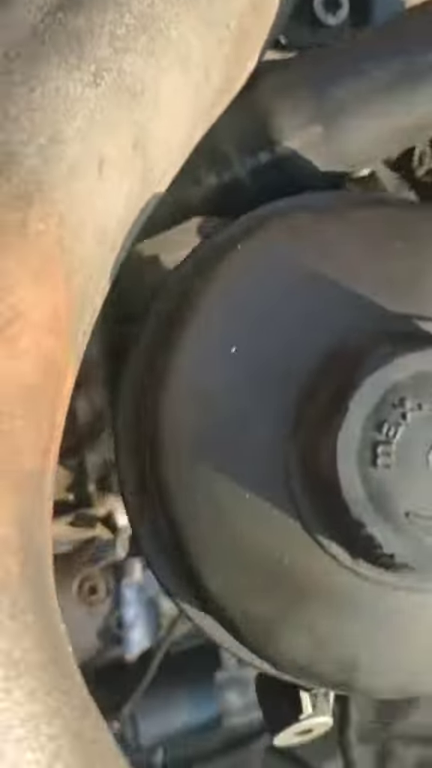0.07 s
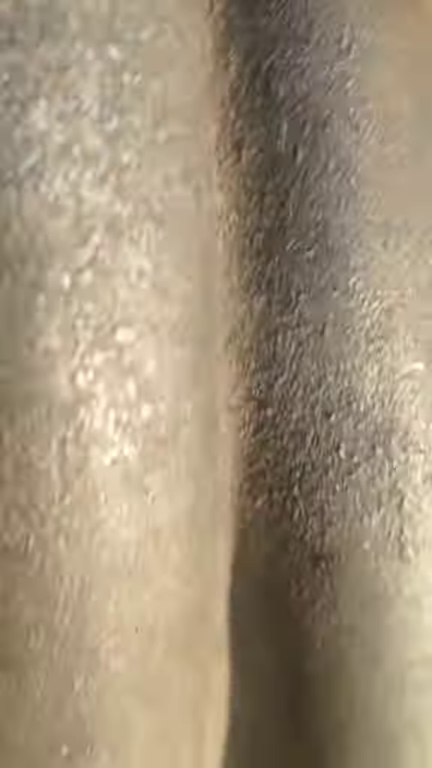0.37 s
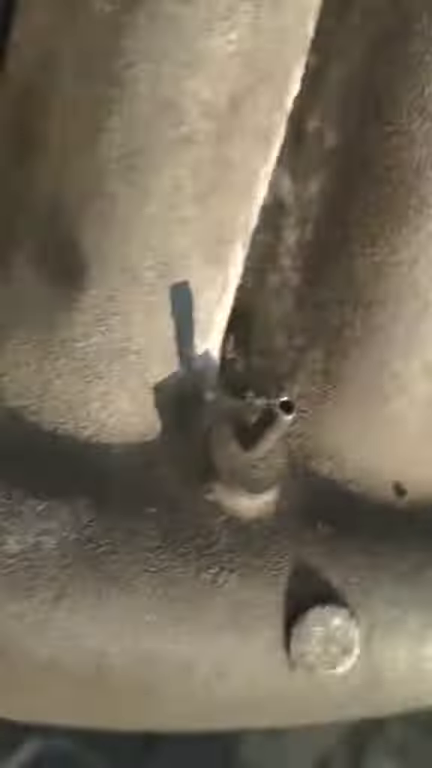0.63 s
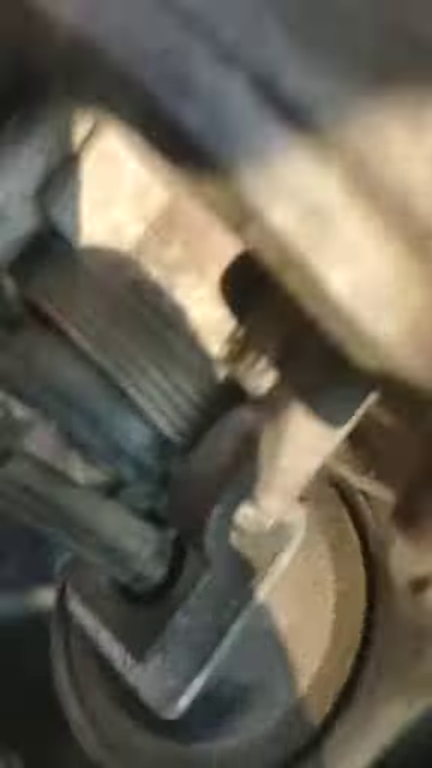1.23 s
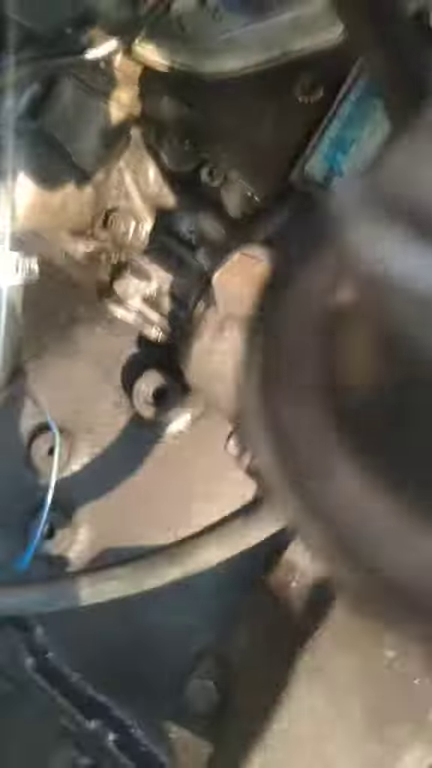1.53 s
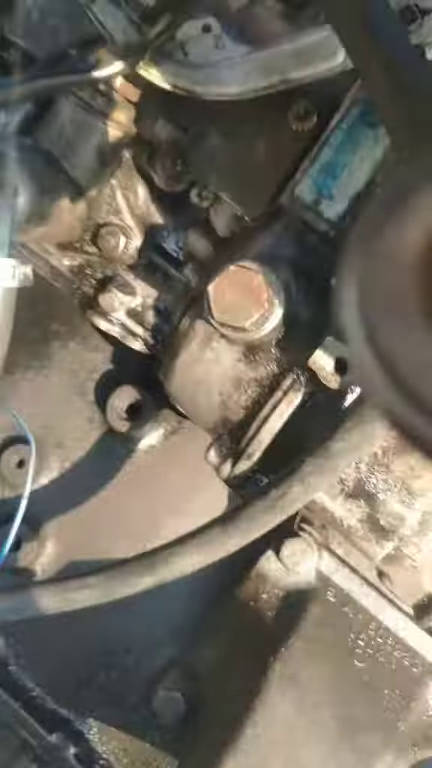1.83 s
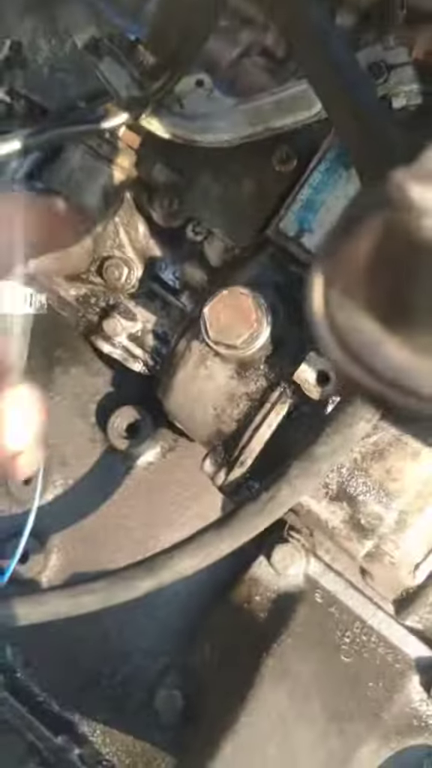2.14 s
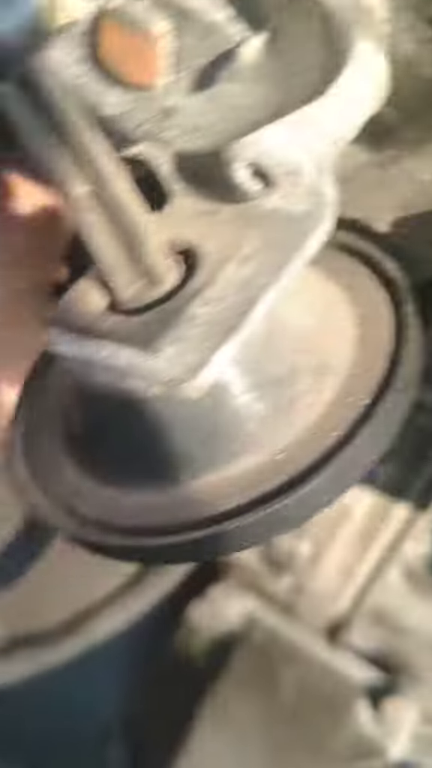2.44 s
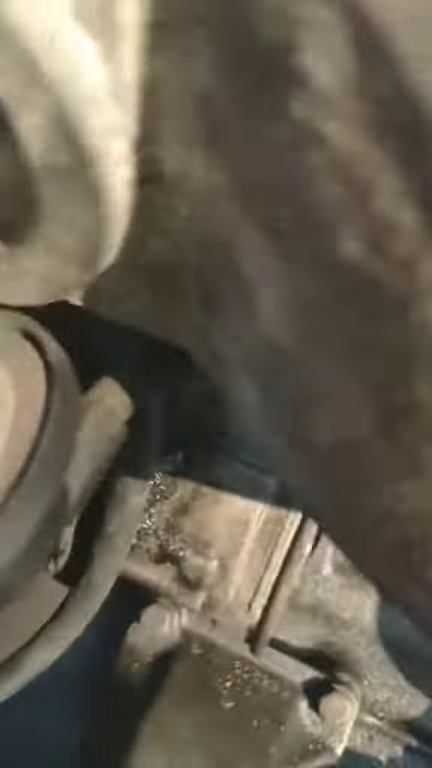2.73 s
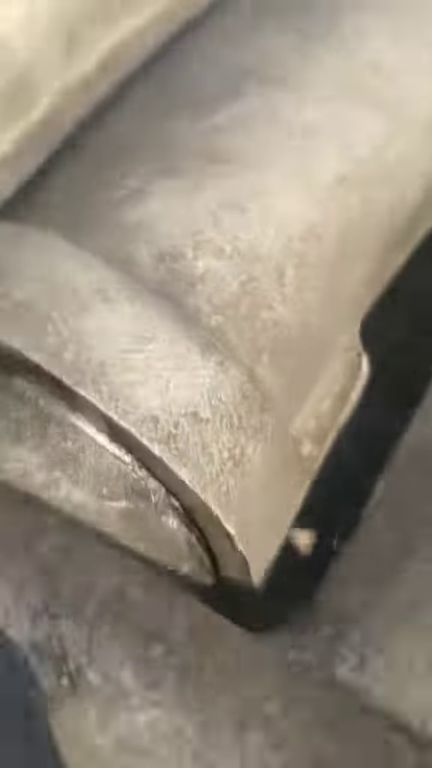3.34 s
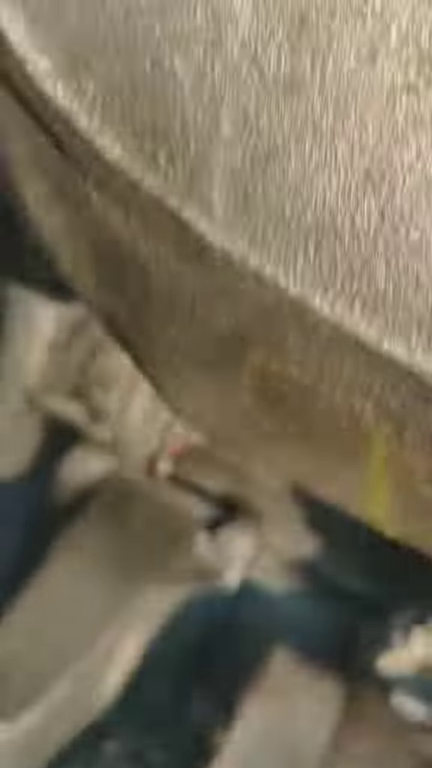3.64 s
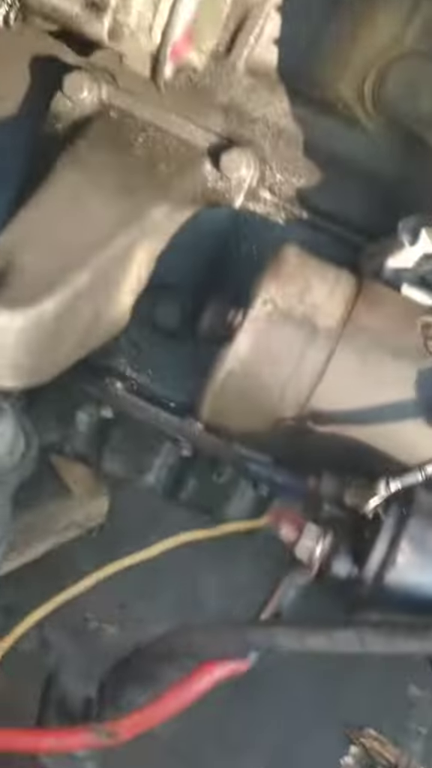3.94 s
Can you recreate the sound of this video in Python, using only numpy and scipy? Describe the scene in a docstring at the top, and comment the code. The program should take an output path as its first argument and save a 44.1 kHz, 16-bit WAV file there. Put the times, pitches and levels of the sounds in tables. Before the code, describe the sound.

A diesel engine idles close up in its bay, with hard, even knocking and light ticking over a low rumble. It then shuts off, shuddering to rest with a few clunks and leaving faint open air.

```python
"""Hard knocking over a lopsided boom: a six-cylinder diesel idling, heard from inside its bay.
Every firing knocks the block, rings the head and sends puffs through the pipes, in a pattern that
returns each engine cycle. Tappets tick; gears, belt and fan churn behind. Near 3 s the fuel is cut:
the engine shudders, its linkages clunk, and it rocks to rest, leaving faint open air."""
import sys
import numpy as np
from scipy import signal
from scipy.fft import rfft, irfft, next_fast_len
from scipy.io import wavfile
from scipy.ndimage import map_coordinates

SR = 44100
rng = np.random.default_rng(int(sys.argv[2]) if len(sys.argv) > 2 else 0)


def file_out(sig):
    """Save sig as 16-bit WAV at sys.argv[1]."""
    # one column per channel
    cols = np.atleast_2d(sig).T
    # limit, then scale
    lim = np.clip(cols, -1, 1)
    pcm = np.round(lim * 32767).astype(np.int16)
    wavfile.write(sys.argv[1], SR, pcm)


N = 176400
TIME_S = np.arange(N) / SR
FUEL_CUT_S = 2.96
KNOCK_RISE_S, CRACK_RISE_S = 0.00062, 0.00061
KNOCK_WIDTH, CLACK_WIDTH = 0.61, 0.37  # side/mid


def amp(db):
    """dB to amplitude."""
    return 10 ** (np.asarray(db) / 20)


def unit(x):
    """Scale to rms 1."""
    return x / np.sqrt(np.mean(np.abs(x) ** 2) + 1e-20)


def curve(rows, at_s=TIME_S):
    """Interpolate a (t/s, value) table."""
    return np.interp(at_s, *np.transpose(rows))


def wobble(knots_per_s):
    """Smooth random curve."""
    return map_coordinates(rng.standard_normal(N // 20), [TIME_S * knots_per_s], mode="wrap")


def colour(points):
    """Response through (f/Hz, gain/dB) points, log frequency axis."""
    hz, db = np.transpose(points)
    return lambda f: amp(np.interp(np.log(f + 1), np.log(hz + 1), db))


def body(modes):
    """Causal response of (f/Hz, bandwidth/Hz, gain/dB) resonances, alternating in sign."""
    return lambda f: sum((-1) ** k * amp(db) * 1j * f * bw / (hz * hz - f * f + 1j * f * bw)
                         for k, (hz, bw, db) in enumerate(modes))


def filtered(x, response):
    """Apply a frequency response."""
    size = next_fast_len(N + SR // 2)
    return irfft(rfft(x, size) * response(np.fft.rfftfreq(size, 1 / SR)), size)[..., :N]


def rattle(envelope, response, width, mono_below_hz=990):
    """Random contacts shake a body: stereo noise, rms following the envelope."""
    mid, side = rng.standard_normal((2, N))
    side = width * filtered(side, lambda f: f / np.hypot(f, mono_below_hz))
    pair = np.array([mid + side, mid - side])
    return filtered(pair * envelope, lambda f: unit(response(f)))


def bursts(blows, rise_s):
    """Power-summed envelope of (t/s, level/dB, T60/s) blows."""
    power, t = np.zeros(N + SR), np.arange(SR // 2) / SR
    for at_s, db, t60_s in blows:
        envelope = amp(db - 60 * t / t60_s) * (1 - np.exp(-t / rise_s))
        power[max(0, round(at_s * SR)):][:len(t)] += envelope ** 2
    return np.sqrt(power[:N])


def struck_mode(at_s, hz, db, rise_s, t60_s):
    """One decaying sine."""
    return bursts([(at_s, db, t60_s)], rise_s) * np.sin(2 * np.pi * hz * (TIME_S - at_s))


# Air spectrum: f/Hz, density/dB
AIR_SPECTRUM = [(15, -49), (25, -10), (75, -17.5), (113, 11.5), (331, -3.5), (445, -15.5), (2060, -7.5),
                (6050, -15), (9050, -15.5), (13500, -22), (15500, -8)]
# Air envelope: t/s, level/dB
AIR_ENVELOPE = [(3.75, -56), (3.89, -56), (3.94, -47), (4, -53.5)]


def open_air():
    """Faint wide noise, swelling briefly at the end."""
    return rattle(amp(curve(AIR_ENVELOPE)), colour(AIR_SPECTRUM), width=1)


# Hiss spectrum: f/Hz, density/dB
SIGH_SPECTRUM = [(1000, -15), (4000, -1.5), (8000, -10.5), (9800, 0.5), (11000, -13), (15000, -17.5)]


def sigh():
    """Air escapes as the engine stops."""
    envelope = bursts([(3.276, -39, .38)], rise_s=.015)
    return rattle(envelope, colour(SIGH_SPECTRUM), CLACK_WIDTH)


# Churn spectrum: f/Hz, density/dB
CHURN_SPECTRUM = [(25, -10.5), (60, -8.5), (120, 6), (200, 0), (270, 1.5), (350, -2), (480, -10), (800, -9),
                  (1300, -17.5), (1600, -12.5), (2700, -23.5), (3900, -22), (6300, -34.5), (9300, -36),
                  (13000, -44), (16000, -56.5)]
# Envelope of the rotating parts: t/s, level/dB
SPIN_ENVELOPE = [(0, -23.5), (1, -22), (2.9, -21), (3.02, -26.5), (3.13, -30), (3.18, -37.5), (3.27, -41.5),
                 (3.34, -46.5), (3.42, -55), (3.47, -55), (3.56, -51), (3.7, -54), (4, -65.5)]


def churn(grit_db=2.5):
    """Gears, belt and fan churn unevenly, then spin down."""
    level_db = curve(SPIN_ENVELOPE) + grit_db * wobble(knots_per_s=260)
    return rattle(amp(level_db), colour(CHURN_SPECTRUM), width=1)


# Block, head and injector pipe resonances: f/Hz, bandwidth/Hz, gain/dB
BLOCK_MODES = [(467, 47, -9.5), (589, 21.4, -2.5), (966, 445, -8), (1198, 250, -4.5), (1595, 138, -0.5),
               (1800, 206, -0.5), (2050, 490, -6)]
HEAD_MODES = [(2340, 95, 7.5), (3267, 390, 6), (4033, 370, 7), (4510, 810, 2)]
INJECTOR_PIPE_MODES = [(5360, 1300, 2.5), (6540, 120, 3.5), (7230, 430, 0.5), (9470, 950, 0.5),
                       (12600, 1600, -4)]


def tappets(count=190, until_s=3.2, scatter_db=13, t60_s=0.028):
    """Small valve-gear contacts at uneven moments, fading with the spin."""
    jitter, softness = rng.random((count, 2)).T
    times_s = (np.arange(count) + jitter) / count * until_s
    levels_db = curve(SPIN_ENVELOPE, times_s) - 4 - scatter_db * softness
    taps = bursts([(at_s, db, t60_s) for at_s, db in zip(times_s, levels_db)], CRACK_RISE_S)
    return rattle(taps, body(BLOCK_MODES + HEAD_MODES + INJECTOR_PIPE_MODES), CLACK_WIDTH)


# Loose-part impacts: t/s, thud/dB, T60/s, ring/dB
CLUNK_HITS = [(2.987, -23.5, 0.15, -31.5), (3.039, -19, 0.073, -30), (3.075, -35, 0.092, -37),
              (3.101, -28.5, .12, -35.5), (3.149, -36.5, 0.089, -40), (3.196, -28, 0.068, -45.5),
              (3.219, -25.5, .055, -41), (3.254, -18, 0.045, -31), (3.359, -35.5, 0.36, -47.5),
              (3.384, -40, 0.071, -54.5), (3.483, -41.5, 0.2, -60), (3.575, -43.5, 0.069, -54.5),
              (3.589, -30, 0.071, -45), (3.917, -50, 0.055, -50)]
# Thud spectrum: f/Hz, density/dB
THUD_SPECTRUM = [(60, -22), (200, 1), (350, 8), (560, -2), (900, 1), (1500, -6), (2400, -7), (4500, -15),
                 (7000, -21), (15000, -34)]


def clunks():
    """Loose parts settle, each with a dull thud and a slower-rising bright ring."""
    thud = bursts([(at_s, db, t60_s) for at_s, db, t60_s, _ in CLUNK_HITS], rise_s=0.0015)
    ring = bursts([(at_s, db + 5, t60_s) for at_s, _, t60_s, db in CLUNK_HITS], rise_s=0.0074)
    return (rattle(thud, colour(THUD_SPECTRUM), KNOCK_WIDTH)
            + rattle(ring, body(HEAD_MODES + INJECTOR_PIPE_MODES), CLACK_WIDTH))


# Pipe and mount vibrations: t/s, f/Hz, level/dB, rise/s, T60/s
SHUDDER_MODES = [(2.932, 174, -12, 0.02, 0.46), (2.973, 212, -9, .012, 0.21),
                 (3.058, 120.4, -11, 0.0076, 0.39), (3.063, 187.4, -12, 0.0084, 0.22),
                 (3.099, 212, -16, 0.006, 0.18), (3.1, 573, -26, .01, 0.19),
                 (3.139, 124.2, -12, 0.0057, 0.36), (3.365, 291, -21, 0.015, 0.09),
                 (3.384, 229.4, -23, .0088, .11), (3.486, 233.5, -34.5, 0.0037, 0.17),
                 (3.583, 147, -26.5, 0.0039, 0.35), (3.58, 341, -25, 0.0067, 0.083),
                 (3.583, 572, -32.5, 0.006, .07)]


def shudders():
    """The last compressions shake the pipes and mounts."""
    return sum(struck_mode(*mode) for mode in SHUDDER_MODES)


# Engine speed: t/s, firing rate/Hz
FIRING_RATE = [(0, 24.27), (.35, 24.43), (.7, 24.62), (1.15, 24.4), (1.6, 24.8), (2.1, 24.37), (2.6, 25.04),
               (2.8, 24.04), (2.95, 22.95)]


def crank(first_s=.005):
    """Running firing count per sample, and firing times up to the fuel cut."""
    firing_count = np.cumsum(curve(FIRING_RATE)) / SR
    times_s = first_s + np.interp(np.arange(int(firing_count[-1])), firing_count, TIME_S)
    return firing_count, times_s[times_s < FUEL_CUT_S]


# Engine effort, for hum and boom: t/s, gain/dB
EFFORT_GAIN = [(0, -0.5), (.2, -2), (.45, -1), (.7, 1.5), (1.25, 0.5), (1.85, 1), (2.5, 1), (2.96, -1.5)]
# Block vibration: multiple of firing rate, level/dB
HUM_ORDERS = [(1, -44.5), (3, -50.5), (4, -31), (11, -31), (15, -39), (19, -46.5)]


def hum(firing_count, fade_s=0.037):
    """The block shakes at multiples of the firing rate until the fuel cut."""
    tones = sum(amp(db) * np.sin(2 * np.pi * order * firing_count) for order, db in HUM_ORDERS)
    running = np.clip((FUEL_CUT_S - TIME_S) / fade_s, 0, 1)
    return tones * amp(curve(EFFORT_GAIN)) * running


# Cylinders in firing order: delay/ms, f/Hz, level/dB of the low puff, then of the high puff
CYLINDER_PUFFS = [(20.57, 130.5, -15, 32, 190.8, -7.5), (26.13, 148, -11.5, 20.1, 150, -15.5),
                  (28.8, 128.6, -11, 24.96, 199.2, -6), (28.78, 132, -8.5, 34.3, 210, -20),
                  (30.3, 125, -10, 35, 193.8, -7.5), (19.2, 134.0, -9.5, 23.4, 180, -20.5)]


def boom(firings_s, rise_ms=19.5, fall_ms=22, glide_hz_per_ms=1):
    """Each cylinder puffs twice into the pipes, with its own delays and rising pitches."""
    out = np.zeros(N)
    for k, at_s in enumerate(firings_s[:-1]):
        puffs = np.reshape(CYLINDER_PUFFS[k % len(CYLINDER_PUFFS)], (2, 3))
        near = slice(max(0, int(at_s * SR) - SR // 20), int(at_s * SR) + SR // 8)
        for delay_ms, hz, db in puffs:
            ms = (TIME_S[near] - at_s) * 1000 - delay_ms
            swell = np.exp(-(ms / np.where(ms < 0, rise_ms, fall_ms)) ** 2)
            cycles = (hz + glide_hz_per_ms * ms / 2) * ms / 1000
            out[near] += amp(rng.normal(db, .5)) * swell * np.cos(2 * np.pi * cycles)
    return out * amp(0.5 + curve(EFFORT_GAIN))


# Loud head rings: t/s, f/Hz, level/dB
HEAD_PINGS = [(1.149, 3960, -9), (2.857, 4020, -14), (2.944, 3910, -14.5)]


def pings():
    """A few hard knocks leave a clear high ring."""
    return sum(struck_mode(*ping, KNOCK_RISE_S, t60_s=0.053) for ping in HEAD_PINGS)


# Head overtones: f/Hz, level re head clack/dB, T60/s
HEAD_OVERTONES = [(3144, -8, 0.054), (3430, -11.5, .04), (3934, -8.5, 0.063)]
# Combustion knocks: t/s, block/dB, head/dB, crack/dB, ring f/Hz, ring/dB
COMBUSTION_KNOCKS = [(0.0058, -14, -24, -20.5, 1583, -11.5), (0.0456, -15, -28, -28.5, 1850, -19),
                     (0.0866, -11, -10, -29, 1576, -13), (0.129, -12.5, -23.5, -31, 1652, -6),
                     (0.1683, -20, -22, -18.5, 1600, -17), (0.2098, -11, -34.5, -30.5, 1050, -14),
                     (0.25, -13.0, -15.5, -25, 1542, -10), (0.2934, -9, -16.5, -29.5, 1640, -9),
                     (0.3346, -19, -19, -22.5, 1550, -11.5), (0.3744, -11.5, -15.5, -24.5, 1570, -26.5),
                     (0.4147, -25.5, -22.5, -23, 1970, -22), (0.4563, -16, -21, -22.5, 1440, -17.5),
                     (0.4968, -18.5, -32.5, -20.5, 1660, -12.5), (0.5373, -10.5, -18.5, -17.5, 1580, -13),
                     (0.5781, -20.5, -20, -24.5, 1310, -18.5), (0.6201, -13.5, -17, -31, 1800, -8.5),
                     (0.6596, -11.5, -14.5, -32.5, 1580, -14), (0.6998, -21, -23, -32.5, 1180, -12),
                     (0.7424, -15.5, -29.5, -20, 1580, -13), (0.7826, -13, -21, -22.5, 1697, -14.5),
                     (0.8204, -15.5, -16.5, -21, 1260, -14), (0.8612, -14, -12, -22, 2170, -15),
                     (0.9028, -18.0, -25, -31, 1700, -20.5), (0.9446, -11, -16, -29, 1166, -7.5),
                     (0.9855, -14, -18, -25, 1540, -5), (1.0273, -16, -28.5, -25.5, 1650, -17.5),
                     (1.0678, -11.5, -21, -21, 1637, -9.5), (1.1101, -12.5, -9.5, -20.5, 1640, -8),
                     (1.1499, -13.5, -10, -26, 1637, -13.5), (1.1901, -10.5, -12, -28, 1150, -11),
                     (1.2318, -15, -27, -21.5, 1580, -3.5), (1.2734, -15.5, -29.5, -36, 1040, -15),
                     (1.312, -17, -13, -23, 1526, -10.5), (1.3527, -11.5, -11.5, -18.5, 1667, -14.5),
                     (1.3945, -15, -20, -23.5, 1690, -10), (1.4345, -10.5, -11.5, -17.5, 1140, -11.5),
                     (1.4748, -10.5, -21.5, -22.5, 1567, -7.5), (1.5151, -16, -20.5, -24.5, 1670, -15.5),
                     (1.5545, -14.5, -21.5, -17.5, 1530, -15.0), (1.5964, -11, -8, -19.5, 1742, -5),
                     (1.6369, -15, -25.5, -28.5, 1693, -11), (1.6766, -12, -14.5, -35, 1156, -8.5),
                     (1.7174, -17.5, -21.5, -27, 1805, -11.5), (1.757, -10, -14.5, -31, 1990, -15),
                     (1.7993, -11.5, -17, -20.5, 1564, -13.5), (1.8392, -9.0, -13.5, -22, 1760, -7.5),
                     (1.88, -14.5, -23.5, -26.5, 1665, -11), (1.9209, -10, -16.5, -28, 1580, -14.5),
                     (1.963, -14.5, -17.5, -19, 1570, -7), (2.003, -15.5, -19, -32.5, 917, -11),
                     (2.0444, -14.5, -20.5, -20.5, 1530, -11), (2.0848, -12, -12.5, -19, 1754, -7),
                     (2.125, -10, -26, -24, 1565, -5.5), (2.1652, -12.0, -13.5, -28, 2380, -11),
                     (2.2065, -16, -24.5, -27, 1595, -8.5), (2.2477, -13, -17.0, -26.5, 1710, -14),
                     (2.2882, -12, -27, -25.5, 1557, -7), (2.3304, -13, -19, -22, 1740, -11.5),
                     (2.3681, -14.0, -22.5, -30, 1540, -10), (2.4091, -9, -11, -21.5, 1508, -11),
                     (2.4503, -18, -17, -20.5, 1642, -4.5), (2.491, -12.5, -18, -24.5, 945, -13.0),
                     (2.5306, -9.5, -19.5, -15, 1550, -6.5), (2.5706, -14.5, -17.5, -25.5, 1720, -9),
                     (2.6094, -10.5, -10, -18, 1690, -11.5), (2.6508, -20, -18, -27.0, 1090, -11.5),
                     (2.6907, -14.5, -12, -23, 1570, -12), (2.7329, -9, -10.5, -28, 920, -12.5),
                     (2.7737, -13, -18.5, -15, 1570, -10.5), (2.815, -15, -16.5, -19.5, 2004, -9.5),
                     (2.8565, -11.5, -13.5, -30, 1680, -16.5), (2.8993, -13, -18.5, -27, 1500, -16),
                     (2.9432, -17.5, -14, -17.5, 1733, -10.5)]


def ringing(casting_t60_s=.052, detune=.03, scatter_db=7.5):
    """Each knock rings one casting, and the head's overtones in a new balance."""
    out, t = np.zeros(N + SR), np.arange(SR // 8) / SR
    for at_s, _, head_db, _, ring_hz, ring_db in COMBUSTION_KNOCKS:
        modes = [(ring_hz, ring_db + 1, casting_t60_s)]
        for hz, db, t60_s in HEAD_OVERTONES:
            strength, tuning = rng.uniform(-1, 1, 2)
            modes.append((hz * (1 + detune * tuning), head_db + db + scatter_db * strength, t60_s))
        ring = sum(amp(db - 60 * t / t60_s) * np.sin(2 * np.pi * hz * t) for hz, db, t60_s in modes)
        out[round(at_s * SR):][:len(t)] += ring * (1 - np.exp(-t / KNOCK_RISE_S))
    return out[:N]


def knocks(injector_lead_s=0.0031, chatter_db=2.5):
    """Per firing: injector tick, block knock, head clack and sharp crack as contact clusters, plus ring."""
    ticks, blows, clacks, cracks = [], [], [], []  # t/s, level/dB, T60/s
    for at_s, block_db, head_db, crack_db, _, _ in COMBUSTION_KNOCKS:
        ticks.append((at_s - injector_lead_s, -22, 0.017))
        blows.append((at_s, block_db + 1.5, 0.046))
        clacks.append((at_s, head_db - 1.5, 0.04))
        cracks.append((at_s, crack_db - 1, 0.054))
    chatter = unit(amp(chatter_db * wobble(knots_per_s=1100)))
    block = rattle(bursts(blows, KNOCK_RISE_S), body(BLOCK_MODES), KNOCK_WIDTH)
    ring = ringing()
    head = rattle(chatter * bursts(clacks + ticks, KNOCK_RISE_S), body(HEAD_MODES), CLACK_WIDTH)
    pipes = rattle(chatter * bursts(cracks, CRACK_RISE_S), body(INJECTOR_PIPE_MODES), CLACK_WIDTH)
    return block + ring + head + pipes


def bay_reflections(x, t60_s=.07):
    """Short, dense reflections between the bay panels."""
    t = np.arange(SR // 3) / SR
    tail = rng.standard_normal((2, len(t))) * amp(-60 * t / t60_s)
    return signal.fftconvolve(x, tail / np.linalg.norm(tail[0]), axes=1)[:, :N]


def scene():
    """Idle and stop over open air, in stereo."""
    firing_count, firings_s = crank()
    clatter = knocks() + pings() + tappets()
    background = churn() + open_air()
    reflections = amp(-15) * bay_reflections(clatter)
    drone = hum(firing_count) + boom(firings_s)
    stopping = shudders() + clunks() + sigh()
    return background + stopping + drone + reflections + clatter


# Microphone imbalance: f/Hz, right minus left/dB
MIC_BALANCE = [(60, 2.5), (250, 2.5), (600, 1.5), (1500, 2), (4400, -1), (7700, -1.5), (8800, 32),
               (11500, 11.5), (12700, 13), (15000, 14.5)]
# Treble roll-off: f/Hz, gain/dB
MIC_ROLL_OFF = [(11500, -2), (13500, 1), (14600, -12.5), (15000, -4), (16000, -29.5)]
# Shading of the left microphone as it moves among the pipes: t/s, left minus right/dB
MIC_SHADING = [(2.95, -1.5), (3.08, -4.5), (3.25, -7), (3.5, -3), (3.65, -6.5), (3.85, -3.5)]


def record(dry, ceiling=.96, hardness=8, top_hz=15900):
    """The left microphone is weaker and loses the top treble; soft clip, then low-pass."""
    def microphones(f):
        ratio = colour(MIC_BALANCE)(f)
        return 2 * np.array([1 / (1 + ratio), ratio / (1 + ratio)]) * colour(MIC_ROLL_OFF)(f)
    shaded = filtered(dry, microphones) * amp(np.outer([.5, -.5], curve(MIC_SHADING)))
    clipped = shaded / (1 + np.abs(shaded / ceiling) ** hardness) ** (1 / hardness)
    return filtered(clipped, lambda f: f < top_hz)


dry = scene()
out = record(dry)
file_out(out)
```